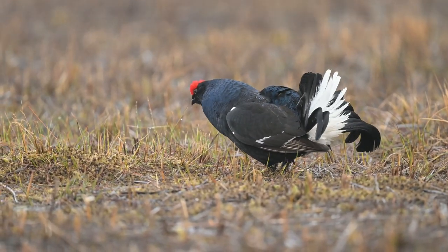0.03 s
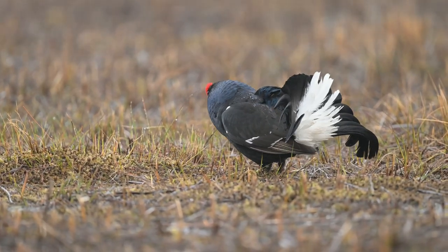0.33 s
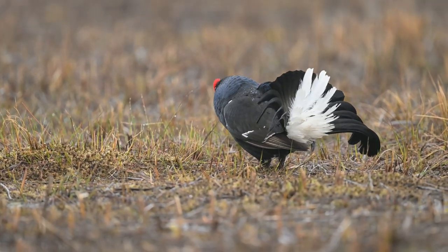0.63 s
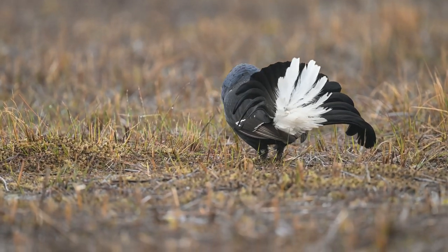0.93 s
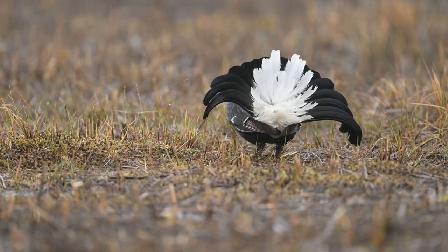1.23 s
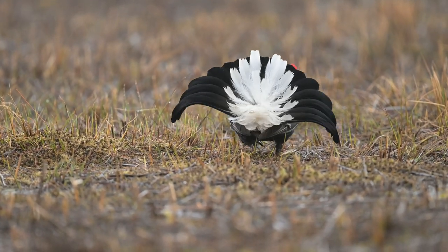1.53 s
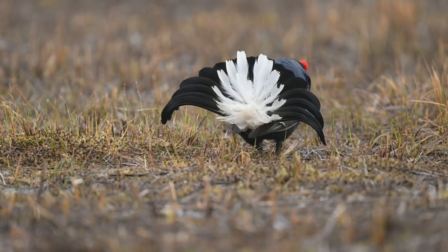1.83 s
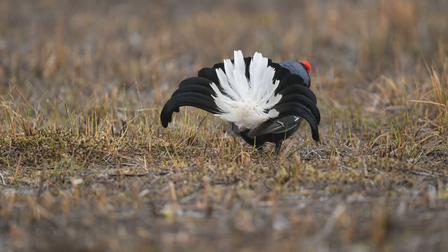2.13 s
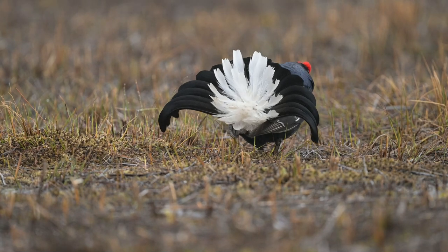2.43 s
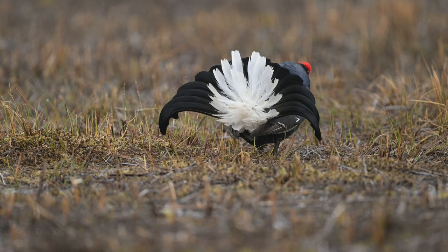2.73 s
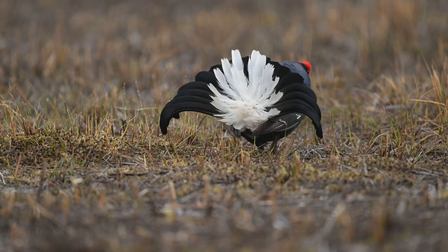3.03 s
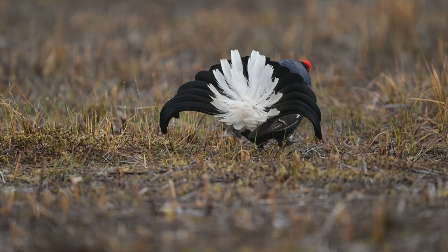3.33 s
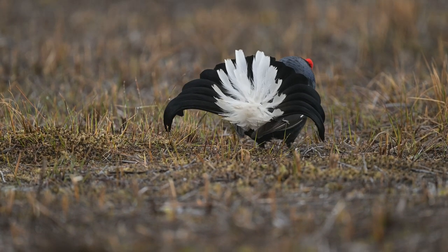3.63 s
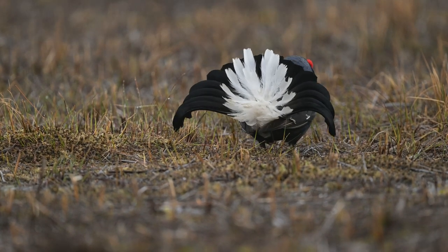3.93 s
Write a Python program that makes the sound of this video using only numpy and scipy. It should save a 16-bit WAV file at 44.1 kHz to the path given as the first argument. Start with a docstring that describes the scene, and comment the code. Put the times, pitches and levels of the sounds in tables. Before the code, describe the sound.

Black grouse bubble and coo in a continuous distant drone over open ground. Close to the microphone, something like cloth slides with a swelling hiss, then scuffs, clicks and creaks in a rattling train of pulses.

```python
"""Black grouse on an open bog

Many far cocks bubble, their notes overlapping into a drone, and single nearer coos stand out.
Close to the microphone something, probably cloth, slides with a swelling hiss, catches in scuffs,
ticks and soft bumps, and creaks in a train of stick-slip pulses.
Quiet air, a faint low hum and the whistles of other far birds lie underneath."""
import sys
import numpy as np
from scipy import signal
from scipy.fft import rfft, irfft
from scipy.io import wavfile
from scipy.ndimage import uniform_filter1d

SR = 44100
rng = np.random.default_rng(int(sys.argv[2]) if len(sys.argv) > 2 else 0)


def to_wav(sig):
    """Store sig (one row per channel, or 1-D mono) as 16-bit WAV at the path in sys.argv[1].

    Samples outside -1..1 are clipped; the rate is SR.
    """
    pcm = np.clip(np.atleast_2d(sig), -1, 1) * 32767
    pcm = np.round(pcm).astype(np.int16)
    wavfile.write(sys.argv[1], SR, pcm.T)  # frames by channels


N = 176400

# Spectrum of mid-range friction noise. Each row: frequency in Hz, gain in dB.
FRICTION_SPECTRUM = [(800, -12.5), (2200, 4.5), (7500, -4), (15500, -18)]


def undb(db):
    """Amplitude ratio of a level in decibels."""
    return 10 ** (np.asarray(db) / 20)


def unit(x):
    """Normalisation to rms 1."""
    return x / np.sqrt(np.mean(x ** 2))


def times():
    """Time of every sample in seconds."""
    return np.arange(N) / SR


def freqs():
    """Frequency of every bin in Hz, at least 1."""
    return np.maximum(np.arange(N // 2 + 1) * SR / N, 1)


def curve(points):
    """Linear interpolation in time between (seconds, value) points."""
    return np.interp(times(), *np.array(points).T)


def colour(x, points):
    """Spectral shaping by (Hz, dB) points, normalised to rms 1."""
    hz, db = np.array(points).T
    gain = undb(np.interp(np.log(freqs()), np.log(hz), db))
    return unit(irfft(rfft(x) * gain, N))


def noise(wide_hz=1270):
    """White noise whose coherence between left and right falls away above wide_hz."""
    mid, side = rfft(rng.standard_normal((2, N)))
    width = 1 / np.hypot(1, (wide_hz / freqs()) ** 2)
    return irfft((mid + width * side * np.array([[1], [-1]])) / np.hypot(1, width), N)


def walk(rate):
    """Smooth random modulation of rms 1, with `rate` new values a second."""
    hold = max(int(SR / rate), 1)
    steps = np.repeat(rng.standard_normal(N // hold + 1), hold)
    return unit(uniform_filter1d(steps, hold)[:N])


def burst(at, rise, fall):
    """Envelope of a transient: exponential growth to a peak, then exponential decay."""
    age = times() - at
    return np.exp(-np.minimum(np.where(age < 0, -age / rise, age / fall), 20))


def tone(hz, db):
    """A sinusoid of given rms level; its phase is the integral of its frequency."""
    return np.sqrt(2) * undb(db) * np.sin(2 * np.pi * np.cumsum(hz) / SR)


def resonance(hz, width):
    """Frequency response of a damped resonator, gain 1 at the centre."""
    return 1 / (1 + 1j * (freqs() / hz - hz / freqs()) * hz / width)


def forest_echo(x, wet_db, side_db, t60_s=1):
    """Reverberation: scattering at the forest edge adds a decaying tail to the direct sound."""
    decay = undb(-60 * np.arange(SR) / SR / t60_s)
    tails = [unit(rng.standard_normal(SR) * decay) / np.sqrt(SR) for _ in range(2)]
    mid, side = (signal.fftconvolve(x, tail)[:N] for tail in tails)
    return x + undb(wet_db) * mid + undb(side_db) * side * np.array([[1], [-1]])


def chorus(note_s=0.0484, arch=0.115, scatter_db=1, left_db=0.3):
    """Superposition: short notes of far cocks, arched in pitch, blur into a bubbling drone."""
    # Low and high register. Each row: pitch in Hz, spread in Hz, notes per second, base level in dB.
    registers = [(489.7, 32, 75, -35), (603.5, 31.14, 65, -34)]
    # Slow fade of the drone. Each row: time in seconds, gain in dB.
    fade = [(0, 1.7), (1.5, 0.7), (4, -0.63)]
    out = 0
    for hz, spread, rate, db in registers:
        voices, count = np.zeros(N + SR), int(rate * N / SR)
        for k, (jitter, detune, size, length, slope) in enumerate(rng.standard_normal((count, 5))):
            n = int(note_s * SR * np.exp(0.32 * length))
            u = np.linspace(-1, 1, n)
            pitch = (hz + spread * detune) * (1 + arch * (.15 - u ** 2 + .5 * slope * u))
            note = np.hanning(n) * np.sin(2 * np.pi * np.cumsum(pitch) / SR)
            start = int((k + jitter) / count * N) % N
            voices[start:start + n] += undb(scatter_db * size) * note
        voices[:SR] += voices[N:]  # overhanging notes wrap round to the start
        out += undb(db) * unit(forest_echo(voices[:N], wet_db=0.5, side_db=-24.5))
    return out * undb(curve(fade)) * undb([[left_db], [-left_db]])


def air(level_db=-56):
    """Ambient noise: steady and broadband, strongest in the bass."""
    # Spectrum of the air. Each row: frequency in Hz, gain in dB.
    spectrum = [(20, -14), (90, 2.5), (200, -11), (330, -2), (1500, -15), (2500, -23.5), (11000, -32.5),
                (15500, -38)]
    return undb(level_db) * colour(noise(), spectrum)


def hum(hz=133.7):
    """A faint low tone wavers by slow random modulation of frequency and amplitude."""
    # Course of the hum. Each row: time in seconds, level in dB.
    levels = [(0, -63), (1.05, -66), (2.0, -48), (2.9, -53.5), (3.3, -58), (3.8, -53)]
    return tone(hz * (1 + 0.0045 * walk(8)), curve(levels) + walk(15))


def coos(hz=598, level_db=-24, half_s=0.033, sag_hz_per_s=700, waver_hz=18, flutter_db=1.8):
    """Nearer cocks: almost pure, sinking tones, with one flutter modulating pitch and amplitude."""
    # Single coos. Each row: middle in seconds, strength in dB relative to level_db.
    notes = [(0.036, -3.5), (.19, -5.5), (.233, -0.5), (.321, -5.5), (.376, -4), (.485, -7), (.56, -3),
             (.64, -5.5), (.715, 0), (.768, -6), (1.033, 0), (1.105, -9.5), (1.34, -6), (1.442, 1),
             (1.545, -2.5), (1.673, -4), (1.758, -3), (1.841, -4.5), (1.954, -2.5), (2.029, -3.5),
             (2.11, -4.5), (2.185, -6), (2.344, -.5), (2.525, -2), (2.7, -5), (2.793, -6), (2.867, -3.5),
             (3.258, -6.5), (3.605, -6.5), (3.762, -2.5)]
    out = np.zeros(N)
    for at, db in notes:
        age, flutter = times() - at, walk(130)
        half = half_s * undb(0.51 * db)  # stronger notes last longer
        swell = np.cos(np.pi / 2 * np.clip(age / half, -1, 1))
        pitch = hz - sag_hz_per_s * age + waver_hz * flutter
        out += swell * tone(pitch, db + level_db + flutter_db * flutter)
    return forest_echo(out, wet_db=-16, side_db=-19)


def whistles(roughness=0.072):
    """Other far birds: gliding tones, made hoarse by fast random frequency modulation."""
    # Each row: middle in seconds, half length in seconds, pitch in Hz, relative glide per second,
    # level in dB.
    calls = [(.612, .06, 1588, -4, -62), (1.182, 0.027, 1220, -2, -55), (2.435, 0.021, 1237, -4.5, -56),
             (2.83, 0.083, 1100, 1, -53.5), (2.918, 0.011, 1700, 4.5, -46)]
    out = 0
    for at, half, hz, glide, db in calls:
        age = np.clip(times() - at, -.5, .5)
        pitch = hz * np.exp(glide * age) * (1 + roughness * walk(400))
        out += np.exp(-(age / half) ** 2) * tone(pitch, db)
    return forest_echo(out, wet_db=-11, side_db=-9)


def sizzle():
    """Forced resonance: friction noise excites the treble peak of each microphone."""
    # Left and right resonance. Each row: centre in Hz, bandwidth in Hz, gain in dB.
    ports = [(10420, 1060, 0), (11600, 1170, -0.5)]
    # Tilt laid over the peaks. Each row: frequency in Hz, gain in dB.
    tilt = [(2000, 10.5), (10000, 3), (15500, -7)]
    peaks = np.array([undb(db) * resonance(hz, width) for hz, width, db in ports])
    return colour(irfft(rfft(noise()) * peaks, N), tilt)


def slide(hiss_gain_db=4.5, sizzle_gain_db=1.5, flicker_db=0.74, grain=0.093):
    """Sliding friction, as of cloth: strokes of grainy hiss and sizzle swell, fade and add in power."""
    # Each row: middle in seconds, half length in seconds, hiss and sizzle in dB before their gains.
    strokes = [(0.7, 0.16, -69, -64.5), (0.85, 0.08, -59, -56), (1.44, 0.4, -52, -48),
               (1.634, 0.11, -48.5, -39.5), (1.818, 0.12, -46.5, -43.5), (2.1, 0.18, -45, -42.5),
               (2.544, 1, -55.5, -50.5), (3.492, 0.33, -47.5, -38), (3.985, 0.34, -48, -33.5)]
    # Spectrum of the hiss. Each row: frequency in Hz, gain in dB.
    spectrum = [(30, -14.5), (100, 3.5), (1200, 8), (2800, 3), (8000, 0.5), (15500, -24)]
    hiss_power, sizzle_power = undb(-78.5) ** 2, undb(-74.5) ** 2  # floor between strokes
    for at, half, hiss_db, sizzle_db in strokes:
        swell = np.exp(-np.minimum(((times() - at) / half) ** 2, 20))
        hiss_power += (undb(hiss_db) * swell) ** 2
        sizzle_power += (undb(sizzle_db) * swell) ** 2
    grains = colour(noise() * np.exp(grain * walk(1500)), spectrum)
    hiss = undb(hiss_gain_db) * np.sqrt(hiss_power) * grains
    treble = undb(sizzle_gain_db) * np.sqrt(sizzle_power) * sizzle()
    return (hiss + treble) * undb(flicker_db * walk(39.86))


def ticks(hz=5000, fall_s=0.00064):
    """Impulsive noise in a broad treble band: thin, dry ticks, one alone and one on a scuff."""
    # Each row: time in seconds, peak level in dB.
    impulses = [(.821, -28), (2.942, -24)]
    snap = unit(irfft(rfft(noise()) * resonance(hz, width=6200) ** 2, N))
    return snap * sum(undb(db) * burst(at, fall_s / 2, fall_s) for at, db in impulses)


def scuffs():
    """Transient friction: each brief catch has its own mix of dull, middle and bright noise."""
    # Each row: peak time, rise and fall in seconds, then dull, middle and bright levels in dB.
    catches = [(2.283, 0.0014, 0.0038, -53, -39, -40), (2.43, 0.0022, 0.0046, -37, -75, -61),
               (2.532, 0.0094, 0.014, -49, -42.5, -46), (2.662, 0.017, 0.011, -45, -43.5, -45.5),
               (2.94, 0.0012, 0.018, -30.5, -26.5, -24.5), (3.134, 0.0027, 0.013, -30.5, -38, -59),
               (3.281, 0.0025, 0.0074, -27.5, -49, -60), (3.812, 0.0034, 0.016, -32, -26.5, -32.5),
               (3.91, 0.0054, 0.014, -41, -31, -39)]
    # Spectrum of the dull band. Each row: frequency in Hz, gain in dB.
    dull_spectrum = [(130, -20), (600, 10), (1800, -1.5), (2800, -15), (6000, -35)]
    bands = colour(noise(), dull_spectrum), colour(noise(), FRICTION_SPECTRUM), sizzle()
    out = 0
    for at, rise, fall, *levels in catches:
        out += burst(at, rise, fall) * sum(undb(db) * band for db, band in zip(levels, bands))
    return out


def thumps(rise_cycles=0.27, fall_cycles=1.05, sag_s=0.045):
    """Damped oscillations of sinking pitch: soft bumps, most under a scuff; lower ones last longer."""
    # Each row: peak time in seconds, starting pitch in Hz, peak level in dB.
    bumps = [(2.431, 280, -41), (2.972, 89.5, -33), (3.178, 167.6, -40), (3.28, 250, -42),
             (3.813, 304.7, -29.5), (3.91, 264.6, -36)]
    out = 0
    for at, hz, db in bumps:
        pitch = hz * np.exp(-np.clip((times() - at) / sag_s, 0, 1))
        envelope = undb(db) * burst(at, rise_cycles / hz, fall_cycles / hz)
        out += envelope * np.sin(2 * np.pi * np.cumsum(pitch) / SR)
    return out


def creak(knock_db=-27.5, ring_db=-41.5, spray_db=-39):
    """Stick-slip friction: each slip knocks and rings the same body; strong ones throw a spray of hiss."""
    # Pulse train. Each row: time in seconds, relative strength in dB.
    slips = [(3.228, -5.5), (3.263, -1), (3.310, 2.5), (3.347, 2), (3.388, 2.5), (3.434, 2.5), (3.479, 2.5),
             (3.525, 2), (3.56, 0.5), (3.589, 0), (3.615, -2.5), (3.636, -5.5), (3.654, -6), (3.676, -6.5),
             (3.703, -5), (3.731, -5), (3.763, -7.5), (3.791, -4.5)]
    # Modes of the body. Each row: frequency in Hz, level in dB relative to ring_db.
    body = [(916, 8.5), (1056, 0), (1241, 6.5), (1660, 7), (1850, 2.5), (2086, -3), (2402, -2.5)]
    # Spectrum of a knock. Each row: frequency in Hz, gain in dB.
    spectrum = [(550, -18), (850, -1.5), (1700, -0.5), (3000, -14), (15000, -32)]
    rise_s, fall_s, spray_fall_s, body_t60_s = 0.0018, 0.0022, 0.015, 0.049
    alike = 0.93  # share of the knock's power that is the same in every slip
    origin = 0.5  # one slip is built at this time, then shifted to each place in the train
    rasp, age = colour(noise(), spectrum), times() - origin
    modes = sum(undb(db) * np.sin(2 * np.pi * (hz * age + rng.random() + .5 * rng.random((2, 1))))
                for hz, db in body)
    ring = undb(ring_db) * modes * burst(origin, rise_s, body_t60_s / np.log(1000))
    knock = undb(knock_db) * np.sqrt(alike) * rasp * burst(origin, rise_s, fall_s)
    train = sum(undb(db) * np.roll(knock + ring, int((at - origin) * SR), axis=1) for at, db in slips)
    pulses = sum(undb(db + knock_db) * burst(at, rise_s, fall_s) for at, db in slips)
    variation = np.sqrt(1 - alike) * pulses * rasp
    spray = sum(undb(2.15 * db) * burst(at, rise_s, spray_fall_s) for at, db in slips)
    return train + variation + undb(spray_db) * spray * colour(noise(), FRICTION_SPECTRUM)


def scene():
    """Linear superposition of the grouse, the friction beside the microphone and the background."""
    grouse = chorus() + coos()
    friction = slide() + creak() + scuffs() + ticks() + thumps()
    return grouse + friction + air() + hum() + whistles()


def record(dry, cutoff_hz=15750):
    """Band limiting: the recorder's steep low-pass filter removes the highest treble."""
    return signal.sosfilt(signal.ellip(10, .2, 80, cutoff_hz, fs=SR, output="sos"), dry)


dry = scene()
out = record(dry)
to_wav(out)
```